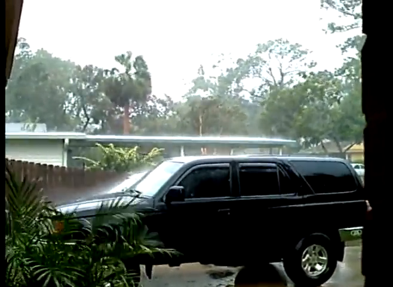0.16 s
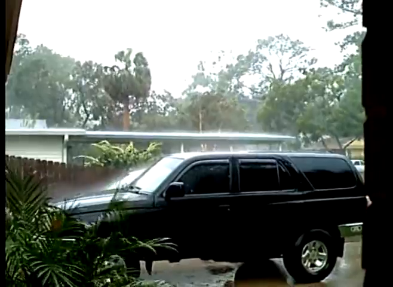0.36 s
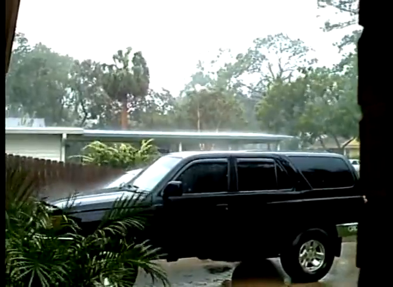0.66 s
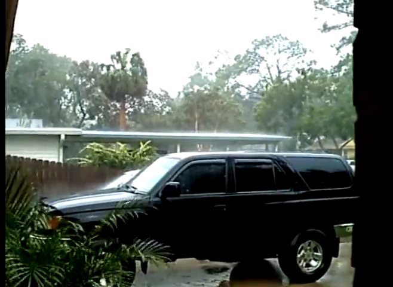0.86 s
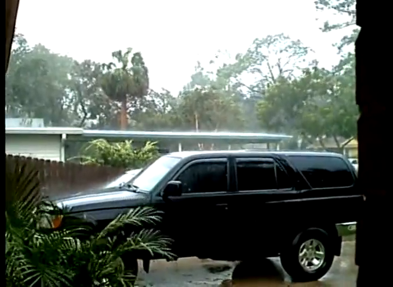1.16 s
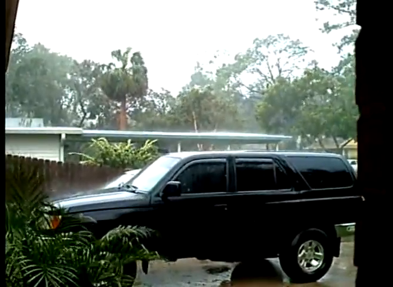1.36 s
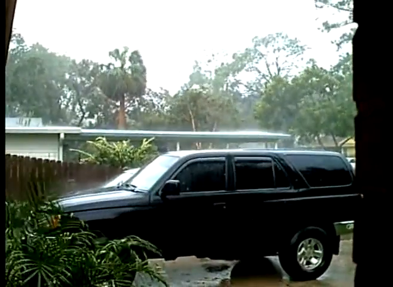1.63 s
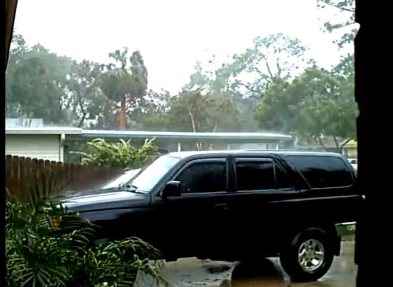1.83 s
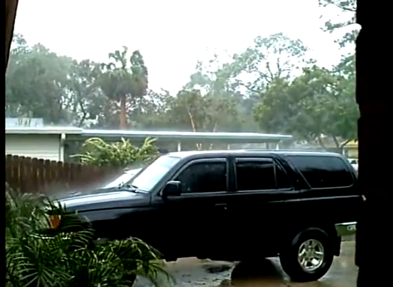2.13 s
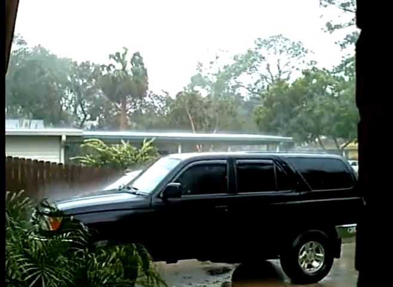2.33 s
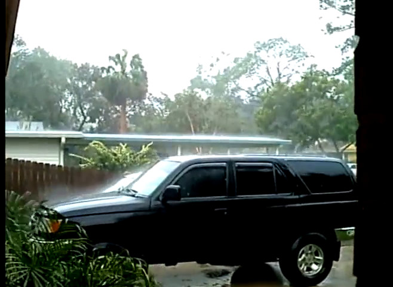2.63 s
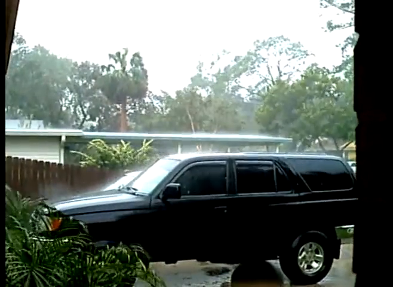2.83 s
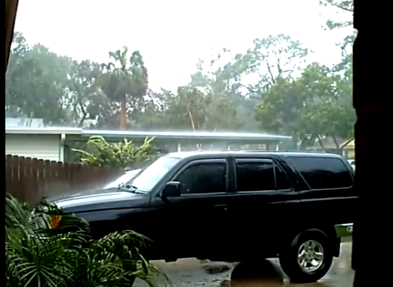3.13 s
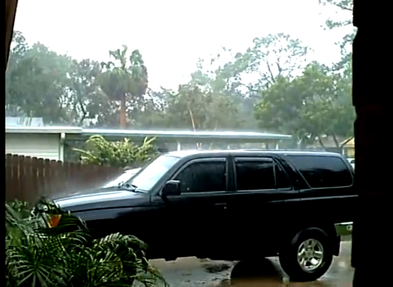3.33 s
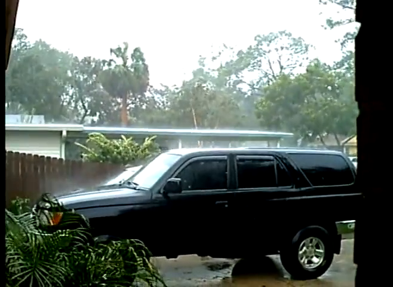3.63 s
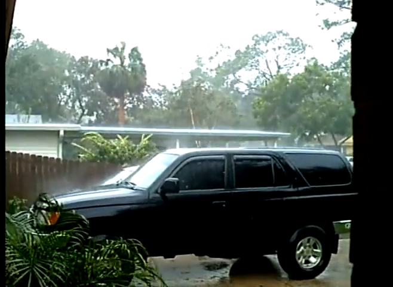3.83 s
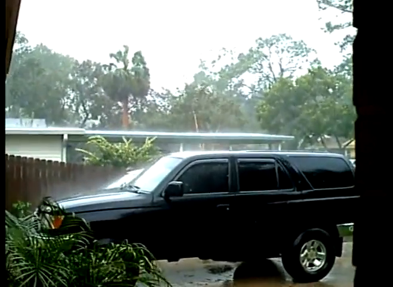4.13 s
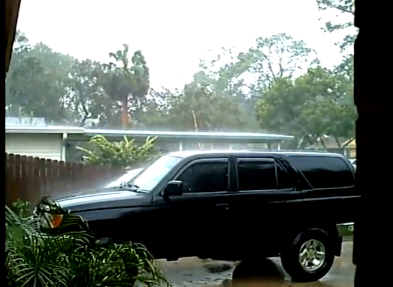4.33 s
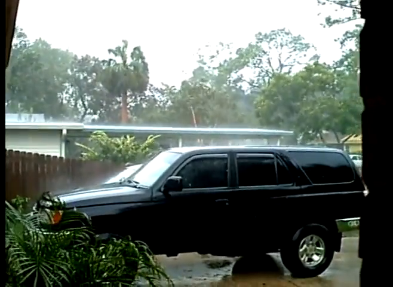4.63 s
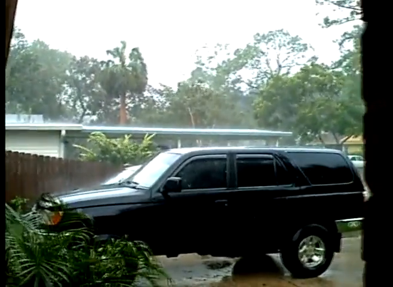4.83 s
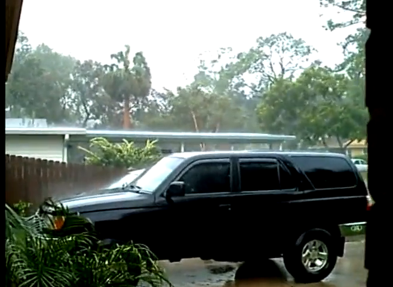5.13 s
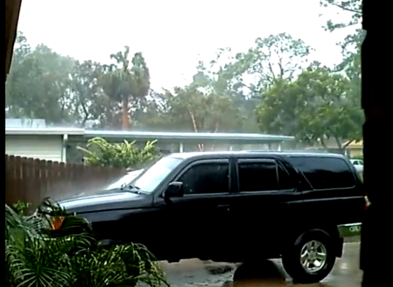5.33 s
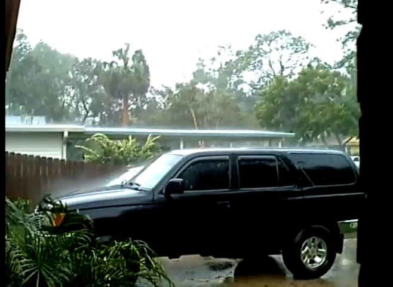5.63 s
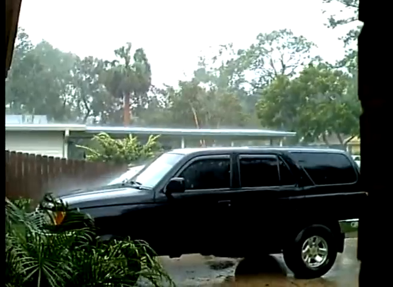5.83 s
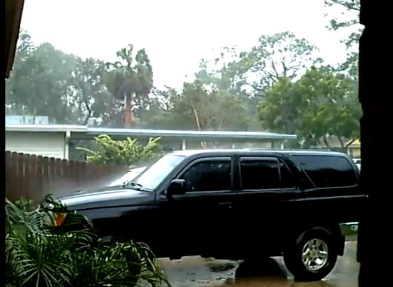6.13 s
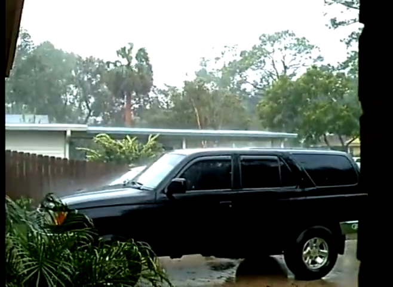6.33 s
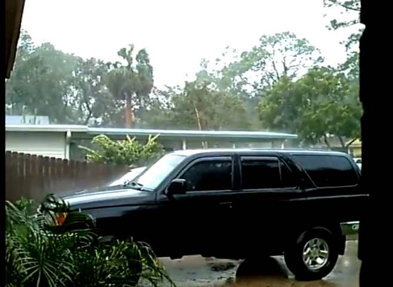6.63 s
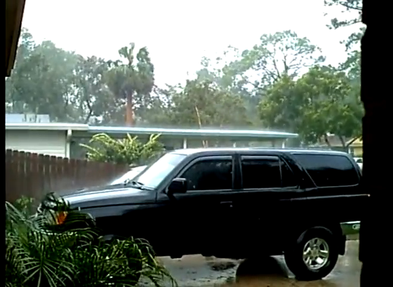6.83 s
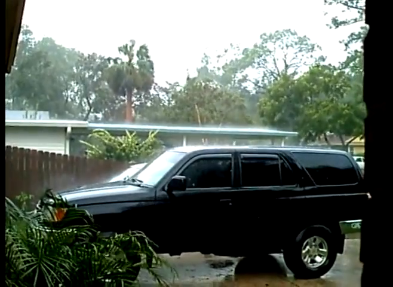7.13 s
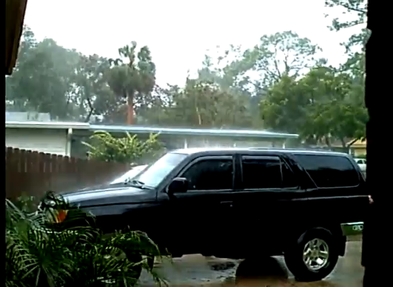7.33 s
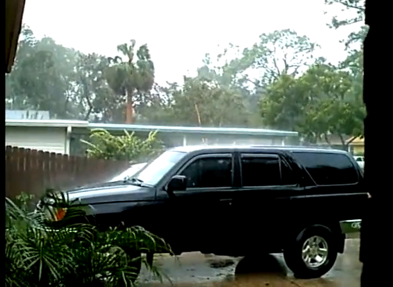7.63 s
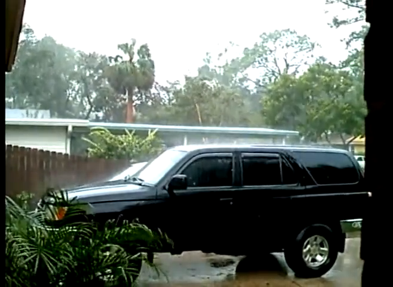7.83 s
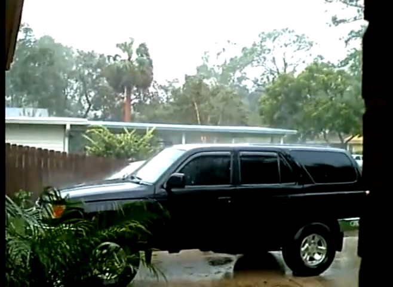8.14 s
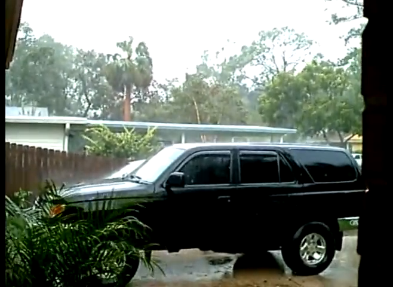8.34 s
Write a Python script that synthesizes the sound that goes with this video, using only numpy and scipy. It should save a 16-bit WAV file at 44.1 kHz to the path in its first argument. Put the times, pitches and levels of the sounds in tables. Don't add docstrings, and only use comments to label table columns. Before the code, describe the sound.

Steady heavy rain fills a driveway and yard, its broad hiss mixed with dull drumming on roofs and metal and a deep, faint boom under the shelter. Wind buffets the small microphone with one short, low double thump near the start. Irregular soft knocks of run-off and occasional crisp ticks of close drips continue to the end. The treble is limited and a bit gritty.

```python
import sys
import numpy as np
from scipy import signal
from scipy.fft import rfft, irfft, next_fast_len
from scipy.io import wavfile
from scipy.ndimage import uniform_filter1d

SR = 44100
rng = np.random.default_rng(int(sys.argv[2]) if len(sys.argv) > 2 else 0)


def to_wav(s):
    ch = np.atleast_2d(s).T
    pcm = np.round(np.clip(ch, -1, 1) * 32767)
    wavfile.write(sys.argv[1], SR, pcm.astype(np.int16))


def invert_db(x):
    u = np.asarray(x, float) / 20
    return 10 ** u


N = 373527

# start_s, level_db
RAINFALL = [(0, -32.5), (.9, -33), (1.4, -33), (1.7, -33.5), (2.1, -34.8), (2.9, -35), (3.25, -35.5),
            (3.77, -34.5), (4.35, -35), (4.9, -34), (5.45, -33), (5.8, -36), (6.3, -36), (6.9, -37),
            (7.2, -35.5), (7.75, -35), (8.25, -36), (8.47, -36.5)]
# start_s, level_db
SLANT = [(0, 0.5), (.7, 1.5), (1.1, 1), (1.6, 2), (2.1, 2.5), (2.5, 1.5), (2.95, 2.5), (3.3, 1), (3.75, 0),
         (4.1, 1.5), (4.9, -2), (5.3, -1), (5.8, -.5), (6.3, -.5), (6.9, .5), (7.7, -1), (8.1, 0.5),
         (8.47, 2.5)]
# level_db, share of the rainfall's changes (0-1), share of the slant's changes (0-1)
YARD_MIX = (-35, 0.97, 0.055)
ROOF_MIX = (-35.5, .95, 0.9)
CAR_MIX = (-38.5, 0.7, .9)
SHELTER_MIX = (-42.5, .3, .1)
# pitch_hz, level_db
SPLASH_COLOUR = [(100, -27), (300, -9), (900, -5.5), (1400, -1), (2400, -0.5), (4500, -4.5), (5000, -7),
                 (5512, -18)]
# pitch_hz, width_hz, level_db
ROOF_MODES = [(537.6, 66, -2.5), (650.5, 82, -3), (739, 102, -1), (1055, 232, -4.5), (1603, 130, -11.5)]
# pitch_hz, width_hz, level_db
PANEL_MODES = [(217.6, 27.5, -3), (299.3, 38.6, -0.5), (345, 49, -2.5), (413, 57, -2.5)]
# pitch_hz, width_hz, level_db
SHELTER_MODES = [
    (91.6, 28.5, 0.5),
    (145, 47, -8.5),
]
# start_s, peak_db, pitch_hz
GOBS = [(0.238, -21, 333), (0.36, -21, 465), (0.401, -22, 493), (0.502, -22, 674), (0.82, -18, 743),
        (0.886, -21, 326), (1.09, -22, 685), (1.454, -21, 676), (1.522, -26, 294), (1.684, -19.5, 391),
        (1.725, -19, 697), (2.054, -17.5, 640), (2.316, -24, 434), (2.892, -19.5, 401), (2.95, -21, 356),
        (3.502, -23, 577), (3.931, -24, 611), (4.274, -21, 658), (4.628, -22.5, 532), (4.849, -24, 750),
        (5.209, -21, 293), (5.56, -23, 403), (6.552, -22, 785), (6.683, -20, 558), (6.931, -26, 417),
        (6.982, -19, 544), (7.087, -23.5, 345), (7.57, -24, 498), (7.727, -25, 750), (8.288, -20, 312)]
# start_s, peak_db, pitch_hz
DRIPS = [(1.129, -28, 4410), (2.375, -20, 4170), (2.594, -32, 4260), (2.6678, -27.5, 4420),
         (3.3338, -21.5, 4400), (3.5894, -31, 4160), (4.6476, -30, 4290), (5.362, -29, 4430),
         (6.809, -29, 4470), (7.5542, -31, 4340), (7.642, -29, 4230)]
# centre_s, peak_db, pitch_hz (minus = push first)
EDDIES = [
    (.886, -16, 100),
    (.8995, -20, 75),
    (.9082, -13.5, 155),
    (.9235, -21, -75),
    (8.1, -32, 40),
]
# centre_s, peak_db, half_length_s
SHOVES = [
    (.33, -31, .012),
    (.914, -21, .007),
    (1.09, -20.5, .006),
    (4.57, -34, .012),
]
# start_s, level_db
WIND = [(0, -40.5), (.3, -41.5), (.6, -45), (1.1, -40.5), (1.45, -41), (1.7, -43.5), (2.1, -43), (2.6, -49),
        (3, -46), (3.3, -42), (3.66, -40), (3.95, -46.5), (4.5, -47.5), (5.5, -50), (6.6, -52.5),
        (7.75, -53), (8.05, -44), (8.47, -48)]
# pitch_hz, level_db
GUST_COLOUR = [(6, -17.5), (15, -3), (26, -2), (42, -1.5), (63, -1), (85, -13.5), (160, -44)]
# pitch_hz, level_db
SMOOTHING = [(4000, 0.5), (5000, 0), (5512, 3.5), (6000, -14), (7000, -36), (8000, -52.5), (9000, -70),
             (11000, -100)]
STRIDE = 4


def yard_hiss():
    near_db, patchy_db = -8, 0.4
    splashes = rng.standard_normal(N) + invert_db(near_db) * drops(1500, 3.07)
    return level(colour(splashes * invert_db(patchy_db * walk(6)), SPLASH_COLOUR), 0)


def roof_drumming():
    return drum(ROOF_MODES, rate=4000, spread_db=1.4, patchy_db=0.8)


def car_drumming():
    return drum(PANEL_MODES, rate=3000, spread_db=1.2, patchy_db=1.0)


def shelter_boom():
    return drum(SHELTER_MODES, rate=3000, spread_db=1.0, patchy_db=0.72)


def drum(modes, rate, spread_db, patchy_db):
    total = np.zeros(N)
    for hz, width_hz, db in modes:
        patches = invert_db(db + patchy_db * walk(3))
        total += patches * ring(drops(rate, spread_db), hz, width_hz)
    return level(total, 0)


def drops(rate, spread_db, biggest=4.2):
    falls = rng.random(N) < rate / SR
    size_db = spread_db * np.minimum(rng.exponential(size=N), biggest)
    return level(falls * invert_db(size_db) * rng.standard_normal(N), 0)


def gobs(rise_s=0.004, cycles=7):
    length = 8192
    out, t = np.zeros(N + length), np.arange(length) / SR
    for start_s, db, hz in GOBS:
        shape = (1 - np.exp(-t / rise_s)) * np.exp(-t * hz / cycles)
        start = int(start_s * SR)
        out[start:start + length] += invert_db(db - 4.5) * shape * np.sin(2 * np.pi * hz * t)
    return out[:N]


def drips(smack_s=0.00044, spray_db=-18, spray_s=0.008, delay_s=0.0011):
    length = 4096
    out, t = np.zeros(N + length), np.arange(length) / SR
    for start_s, db, hz in DRIPS:
        smack = np.sin(2 * np.pi * hz * t) * np.exp(-t / smack_s)
        droplets = level(ring(rng.standard_normal(length), hz, 2500), 0)
        spray = invert_db(spray_db) * droplets * np.exp(-t / spray_s)
        start = int((start_s + delay_s) * SR)
        out[start:start + length] += invert_db(db + 5.5) * (smack + spray)
    return out[:N]


def eddies(narrow=4.3):
    t, out = np.arange(N) / SR, np.zeros(N)
    for centre_s, db, hz in EDDIES:
        turns = (t - centre_s) * hz
        out += invert_db(db) * np.sin(2 * np.pi * turns) * np.exp(-narrow * turns ** 2)
    return out


def shoves(leak_hz=9):
    t, push = np.arange(N) / SR, np.zeros(N)
    for centre_s, db, half_s in SHOVES:
        push += invert_db(db) * np.exp(-((t - centre_s) / half_s) ** 2)
    return signal.lfilter(*signal.butter(1, leak_hz, "high", fs=SR), push)


def wind():
    rumble = colour(rng.standard_normal(N), GUST_COLOUR)
    return invert_db(follow(WIND)) * level(rumble * invert_db(1.1 * walk(4.7)), 0)


def exposure(mix):
    db, wet, blown = mix
    pour = follow(RAINFALL)
    return invert_db(db + wet * (pour - np.mean(pour)) + blown * follow(SLANT))


def follow(curve):
    return np.interp(np.arange(N) / SR, *np.transpose(curve))


def walk(rate):
    hold = int(SR / rate)
    steps = np.repeat(rng.standard_normal(N // hold + 1), hold)
    return 1.2 * uniform_filter1d(uniform_filter1d(steps, hold), hold)[:N]


def ring(x, hz, width_hz):
    return signal.lfilter(*signal.iirpeak(hz, hz / width_hz, fs=SR), x)


def colour(x, points):
    size = next_fast_len(N + SR)
    hz, db = np.transpose(points)
    bins_hz = np.arange(1, size // 2 + 2) * SR / size
    gain_db = np.interp(np.log(bins_hz), np.log(hz), db)
    return irfft(rfft(x, size) * invert_db(gain_db), size)[..., :N]


def level(x, db):
    return x * invert_db(db) / np.sqrt(np.mean(x ** 2))


def scene():
    rain = exposure(YARD_MIX) * yard_hiss()
    rain += exposure(ROOF_MIX) * roof_drumming()
    rain += exposure(CAR_MIX) * car_drumming()
    rain += exposure(SHELTER_MIX) * shelter_boom()
    moving_air = eddies() + shoves() + wind()
    return (rain + gobs() + drips() + moving_air)[None]


def top_cut(x):
    return signal.sosfilt(signal.butter(12, 8940, fs=SR, output="sos"), x)


def record(dry):
    kept = signal.decimate(dry, STRIDE, ftype="fir")
    spaced = np.zeros_like(dry)
    spaced[:, ::STRIDE] = STRIDE * kept
    mix = colour(spaced, SMOOTHING)
    return top_cut(mix)


dry = scene()
out = record(dry)
to_wav(out)
```